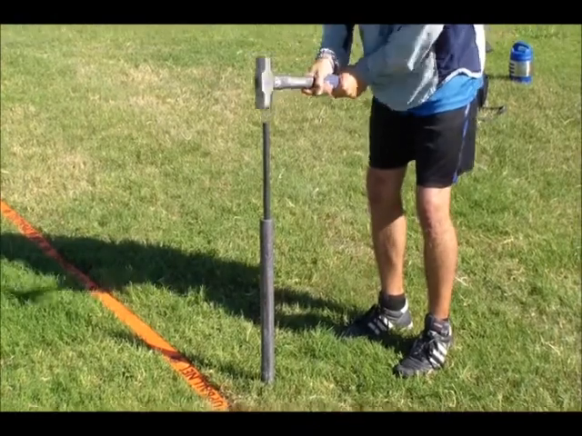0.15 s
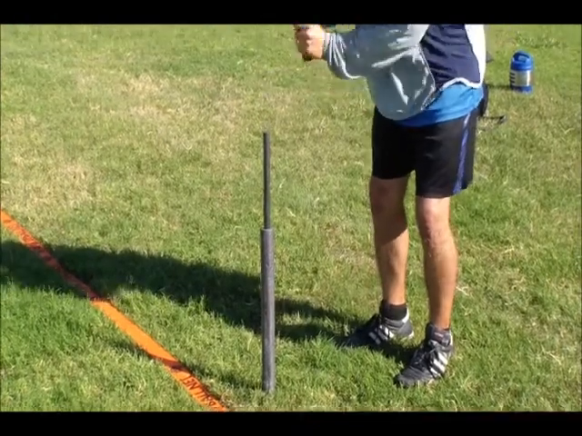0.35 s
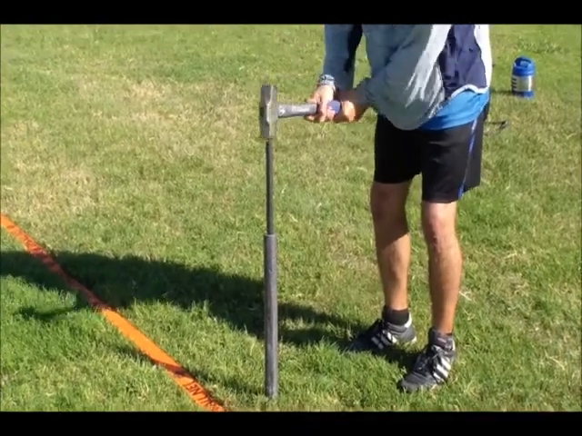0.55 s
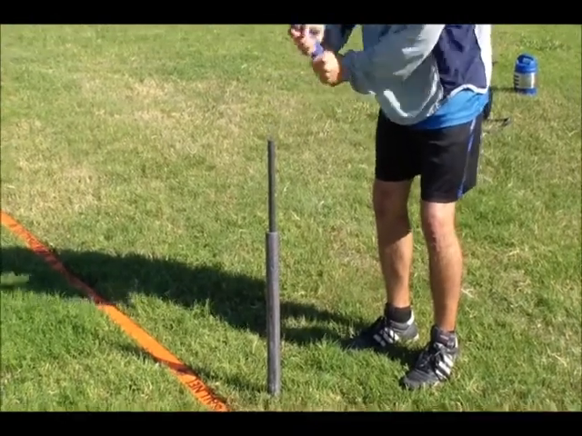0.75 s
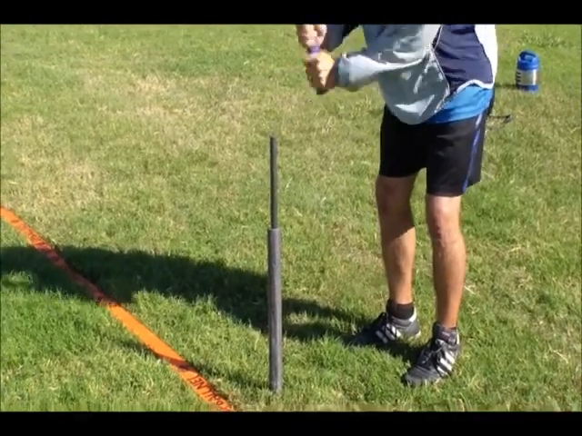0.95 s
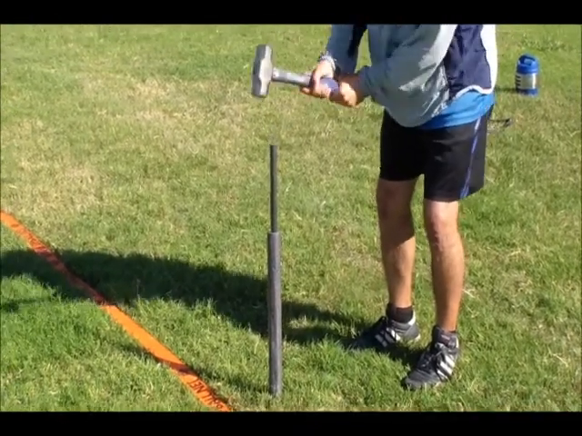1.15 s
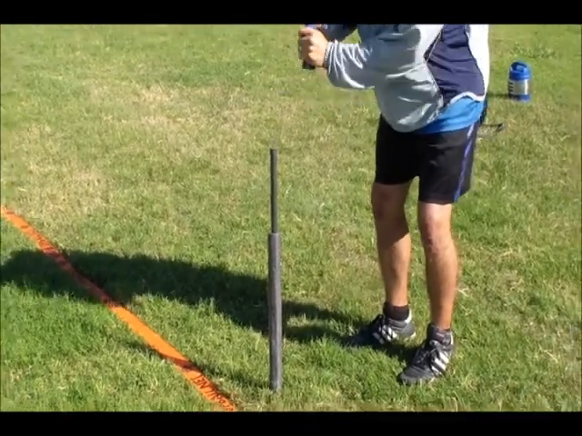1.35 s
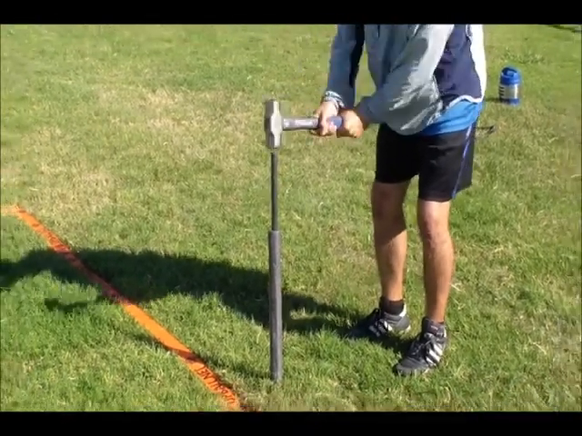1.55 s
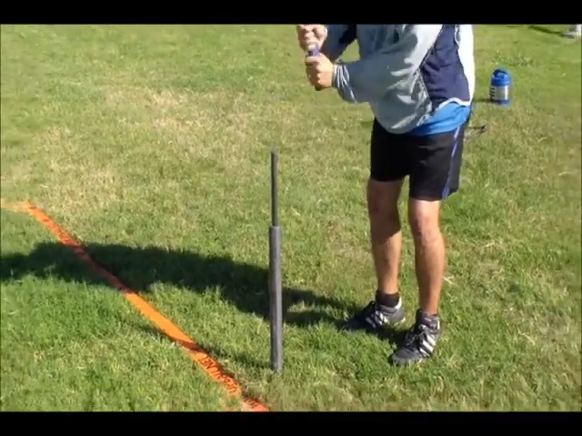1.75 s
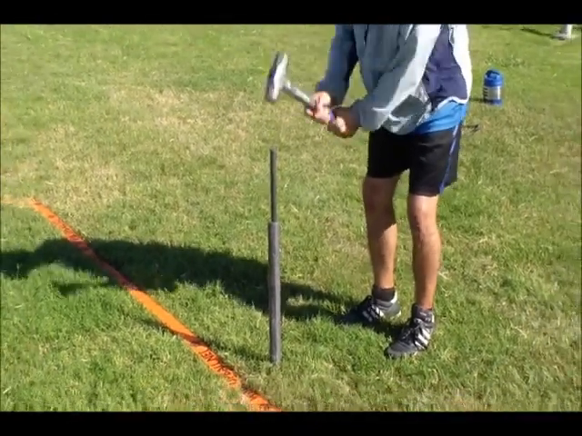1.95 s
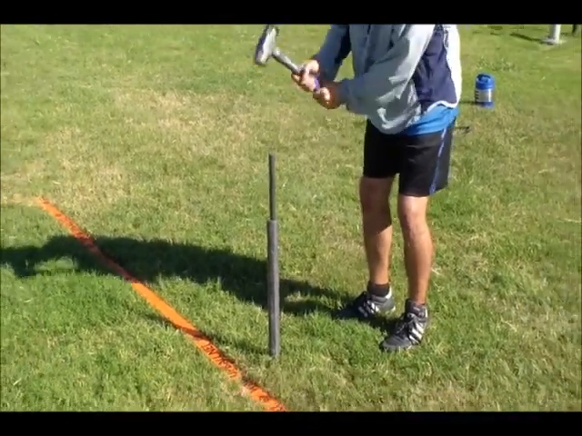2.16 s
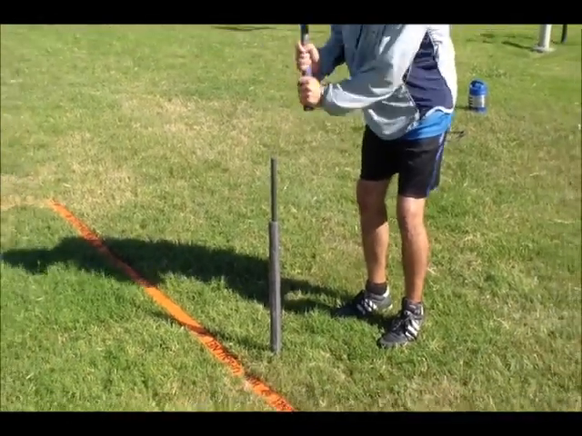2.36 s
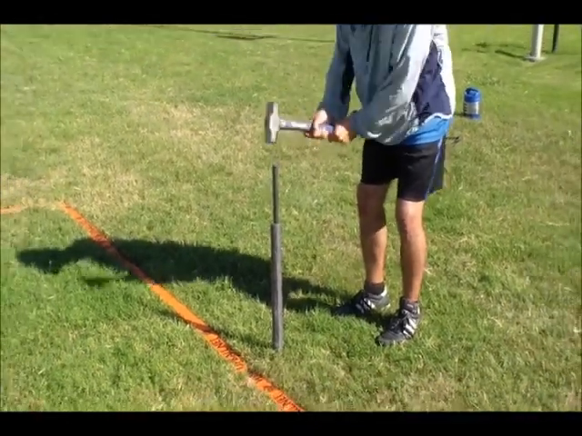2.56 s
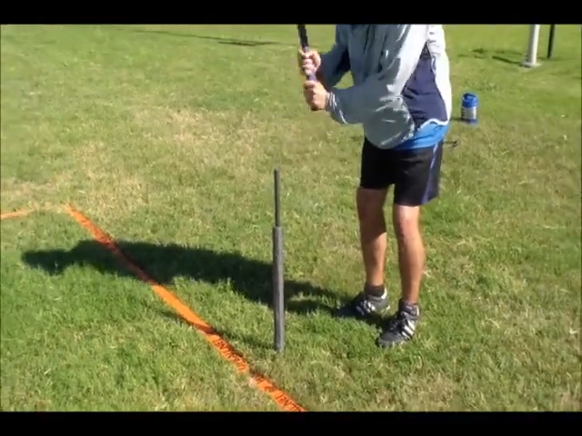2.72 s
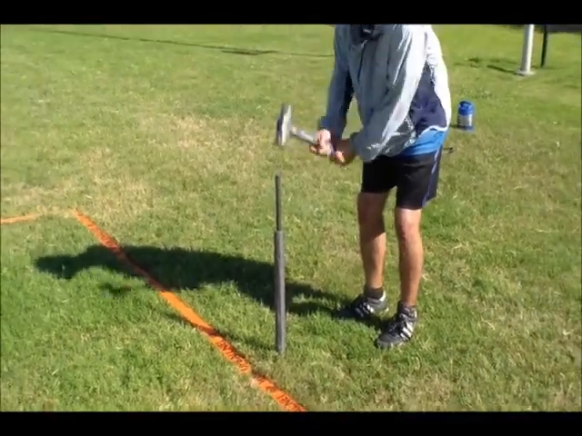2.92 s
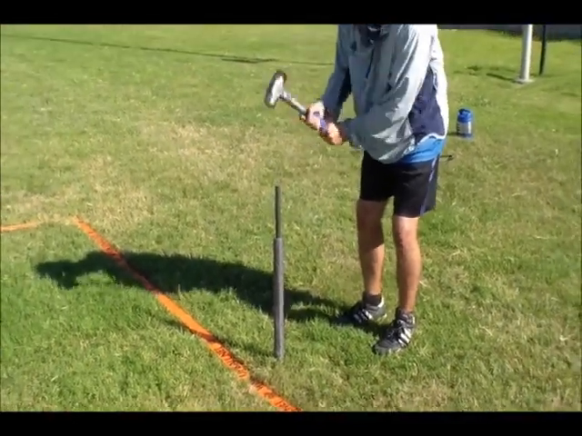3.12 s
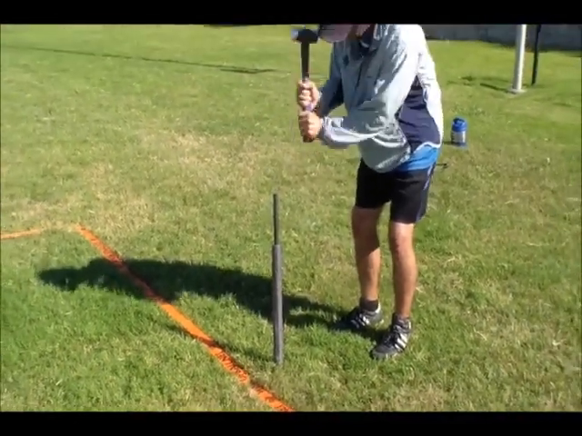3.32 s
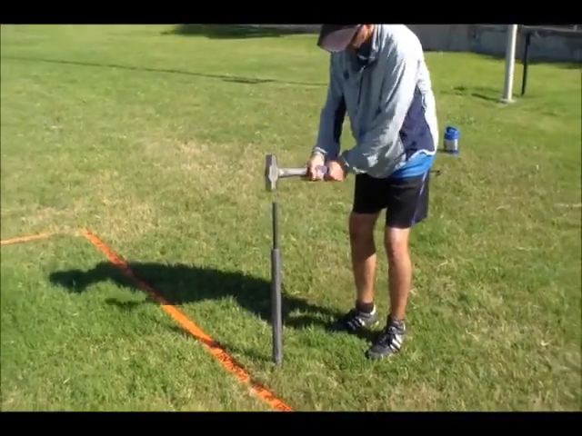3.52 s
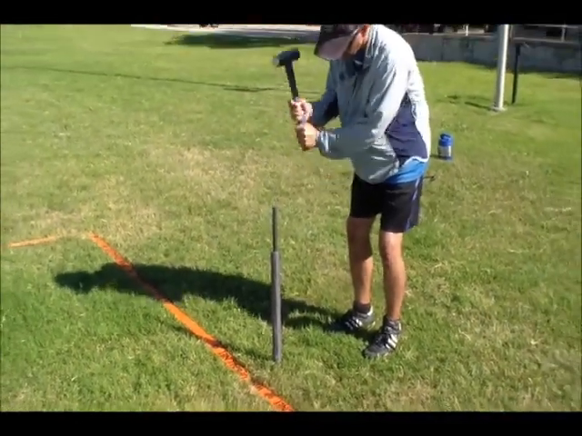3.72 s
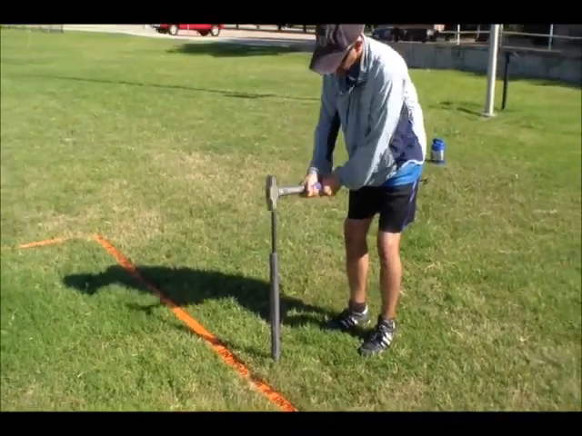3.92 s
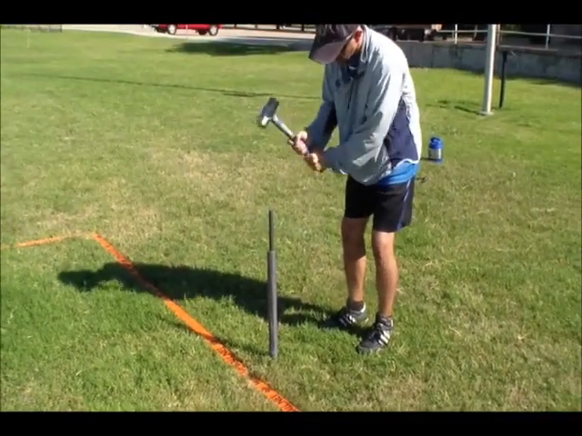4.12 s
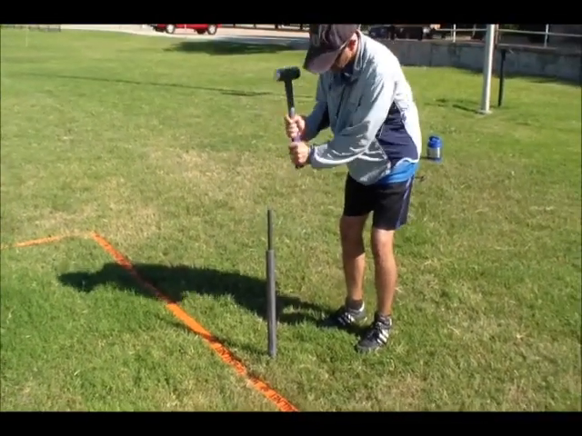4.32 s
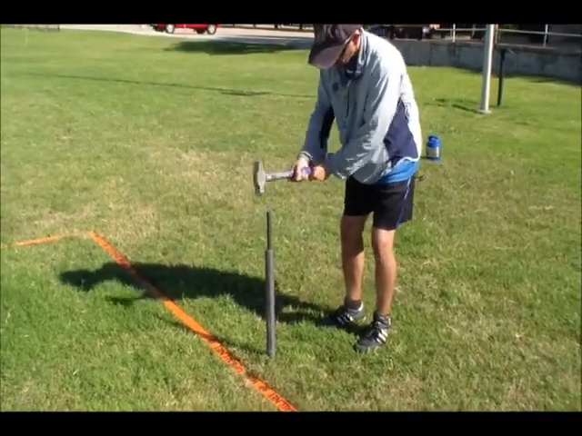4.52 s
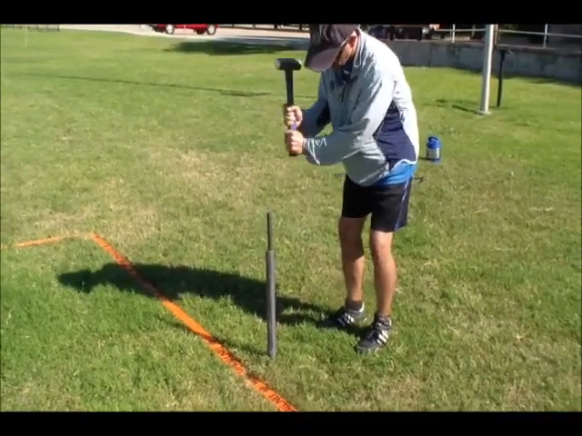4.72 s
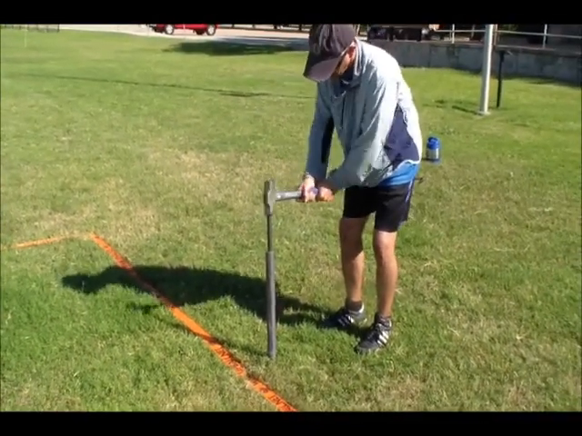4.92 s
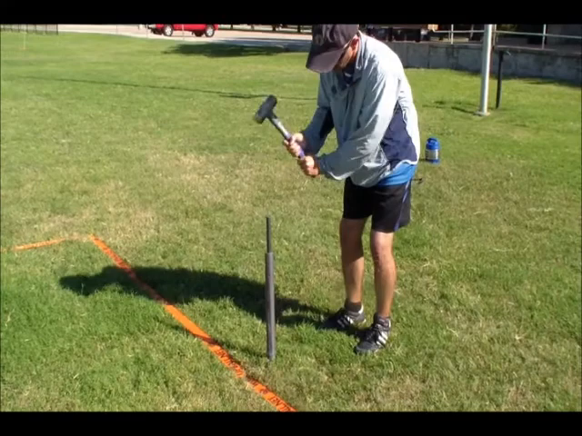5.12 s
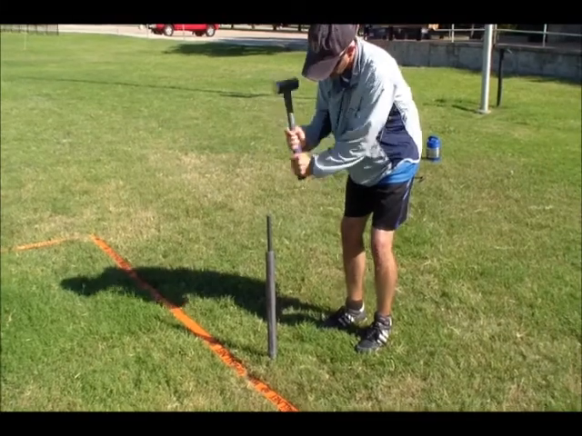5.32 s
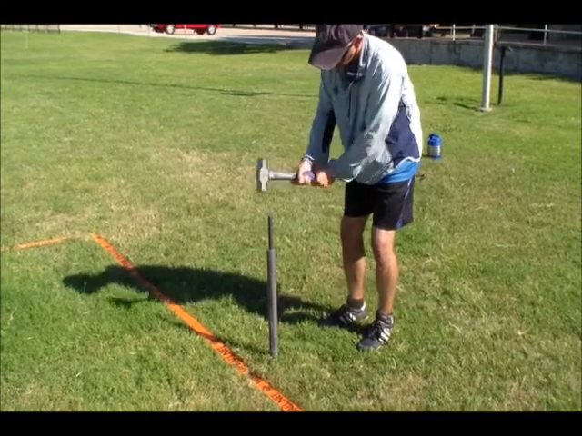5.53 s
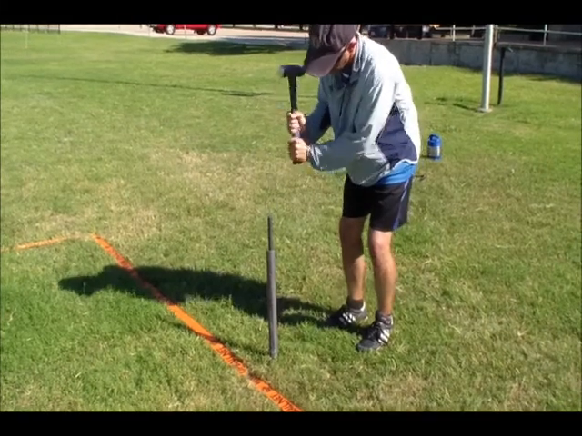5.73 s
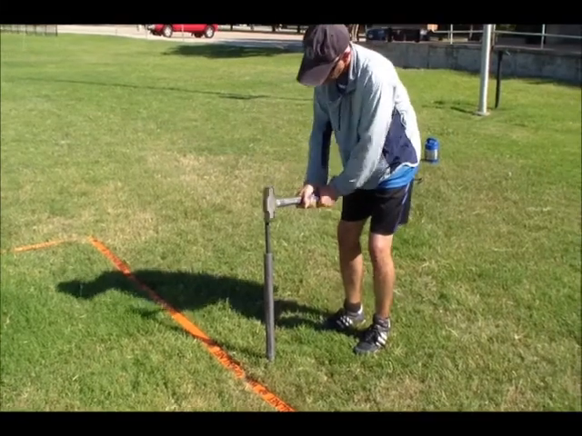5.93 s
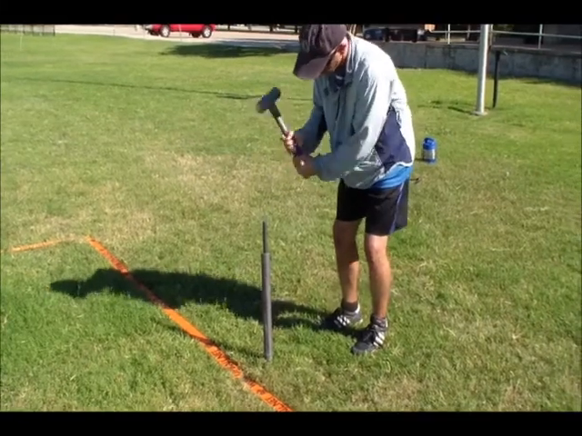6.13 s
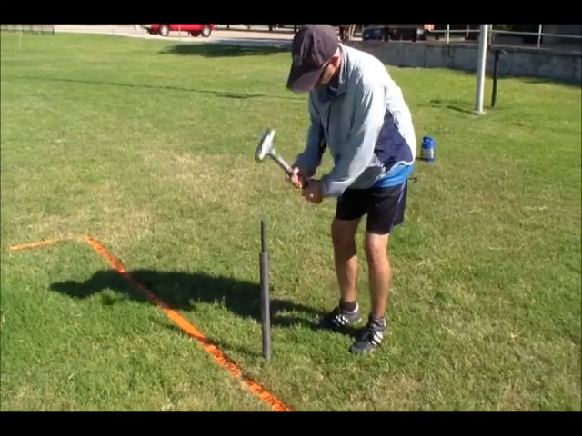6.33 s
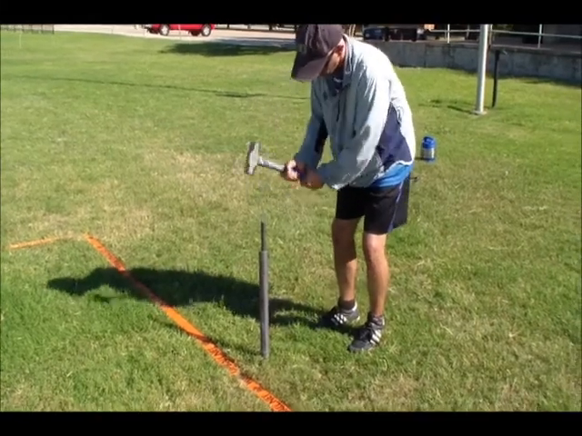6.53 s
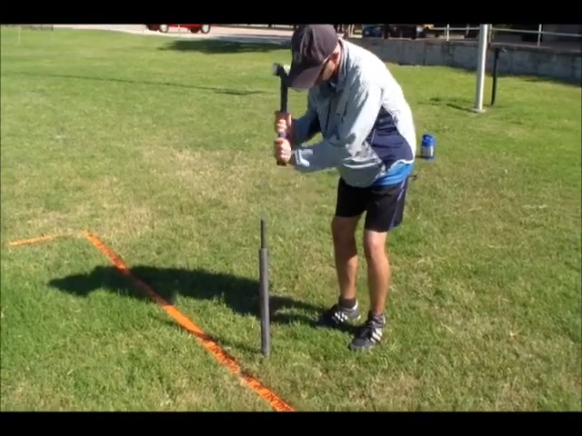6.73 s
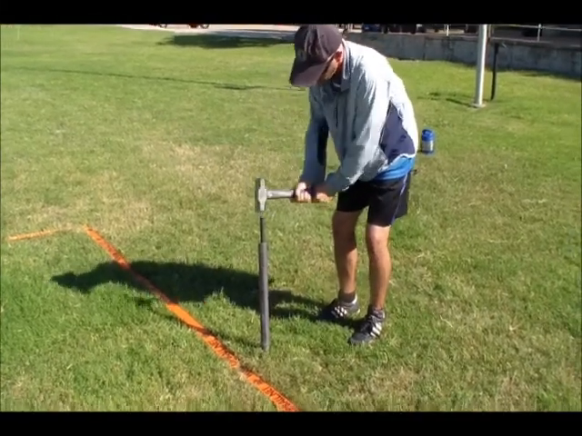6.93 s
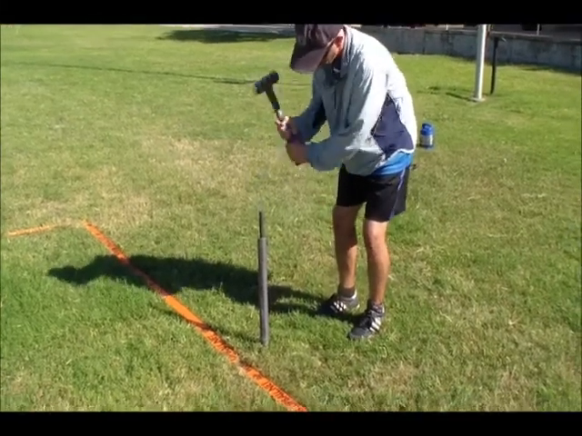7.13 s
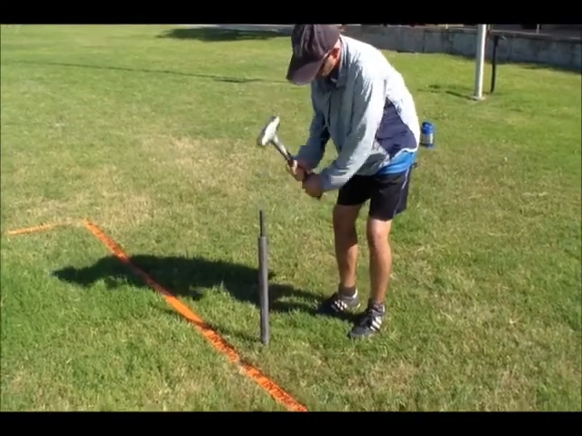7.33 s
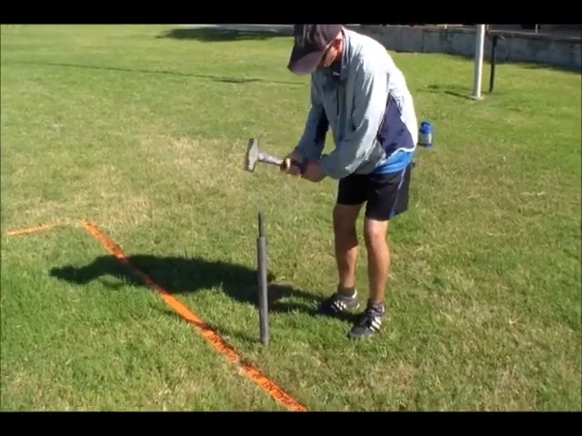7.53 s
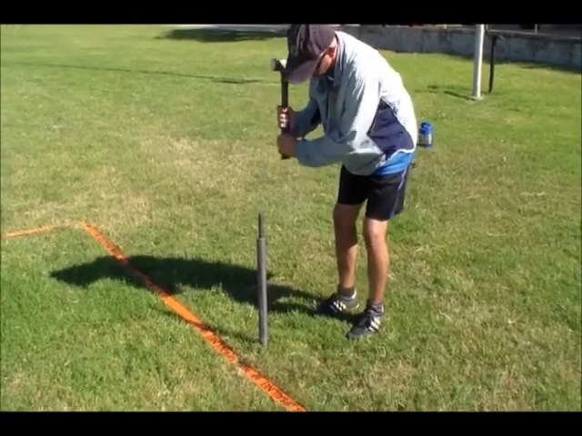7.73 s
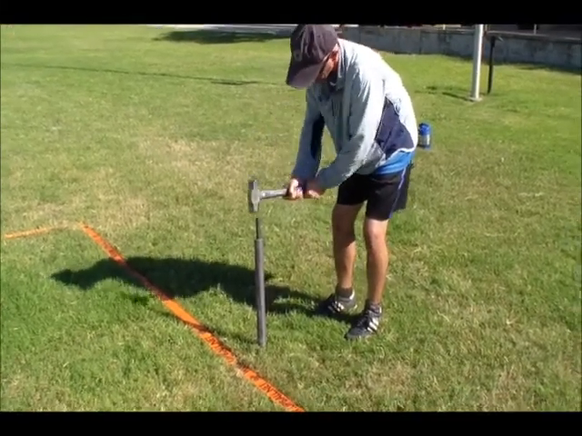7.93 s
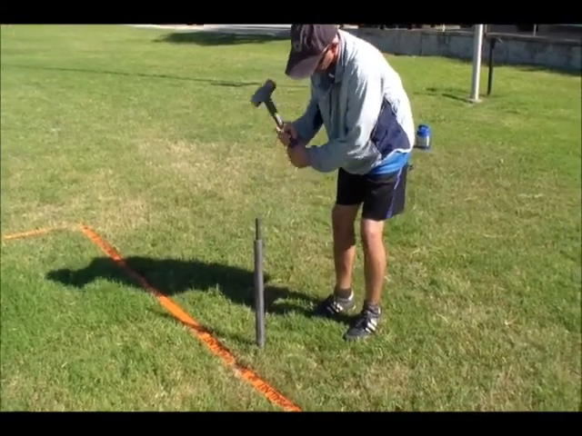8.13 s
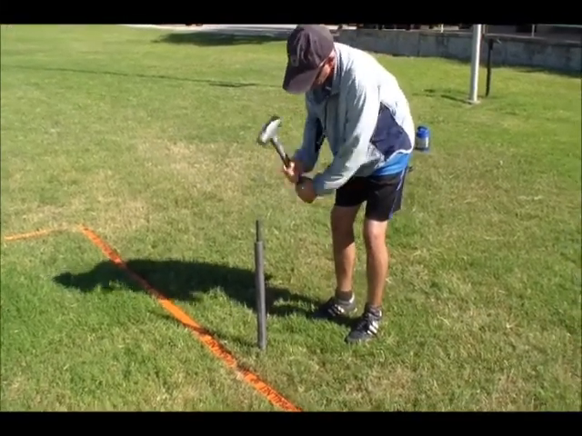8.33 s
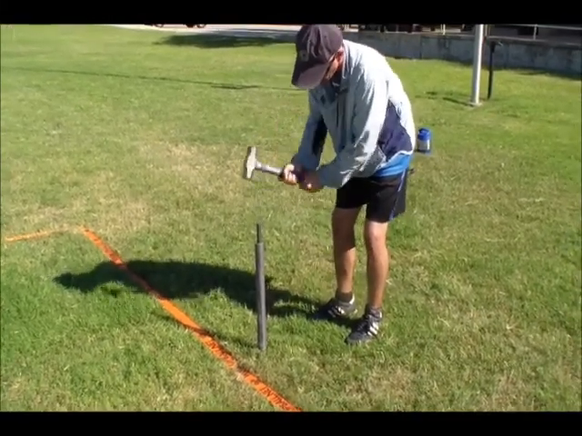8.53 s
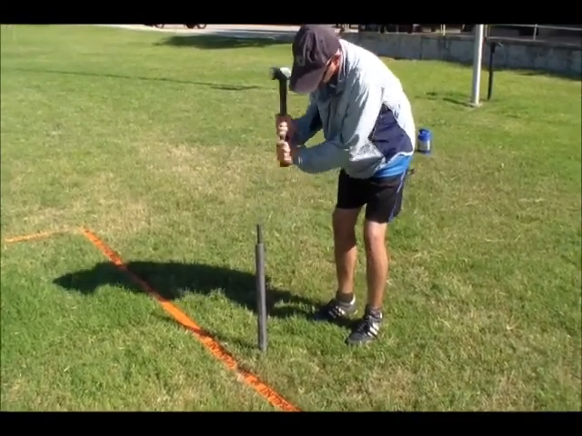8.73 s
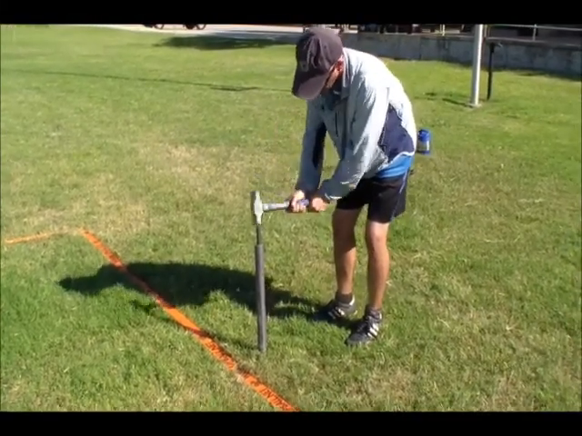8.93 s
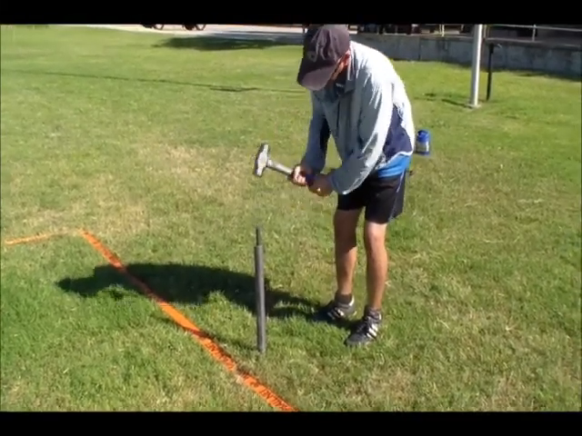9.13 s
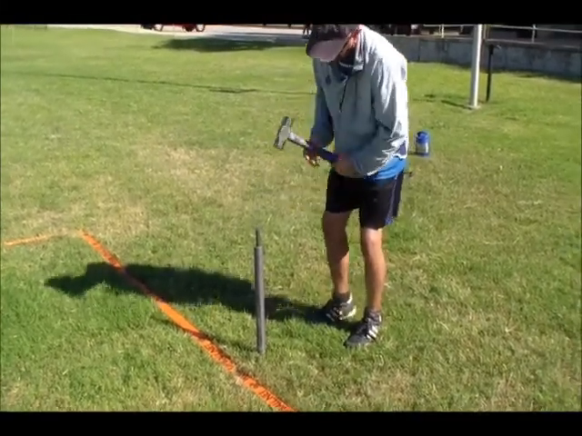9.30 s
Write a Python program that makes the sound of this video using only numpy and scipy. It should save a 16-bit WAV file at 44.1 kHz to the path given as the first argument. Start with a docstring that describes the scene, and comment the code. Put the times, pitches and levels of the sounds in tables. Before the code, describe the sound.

Steady, bright metal-on-metal hammering outdoors, nineteen short hard clinks with small bounces and slapback from far walls over faint traffic rumble.

```python
"""An open lawn: a steel mallet drives a steel rod, two blows a second.
Each blow is a noise crack plus dying sines; the mallet rebounds as duller taps, its head sings on.
Filtered taps return the blow from far walls. Shaped noise makes distant traffic and grass insects;
a far bird whistles once. The input soft-clips, and gain control ducks what follows each blow."""
import sys
import numpy as np
from scipy import signal
from scipy.io import wavfile
from scipy.ndimage import uniform_filter1d, minimum_filter1d

SR = 44100
rng = np.random.default_rng(int(sys.argv[2]) if len(sys.argv) > 2 else 0)


def to_wav(s):
    """Save 16-bit WAV."""
    ch = np.atleast_2d(s).T  # columns
    pcm = np.round(np.clip(ch, -1, 1) * 32767)  # PCM
    wavfile.write(sys.argv[1], SR, pcm.astype(np.int16))


N = 417230


def gain_of(db):
    """Decibels to amplitude."""
    return 10 ** (np.asarray(db) / 20)


def evened(x):
    """Scales to rms 1."""
    return x / np.sqrt(np.mean(x ** 2) + 1e-20)


def read(points, hz):
    """Interpolates a table on a log-frequency axis."""
    f, value = np.transpose(points)
    return np.interp(np.log(hz + 1), np.log(f + 1), value)


def add(mix, time_s, sound):
    """Mixes a sound in at time_s, cut at the end of the mix."""
    part = mix[..., round(time_s * SR):][..., :sound.shape[-1]]
    part += sound[..., :part.shape[-1]]


def ring(modes, t, spread_db=0., damping=1, wander=0.):
    """Sum of exponentially dying sines; random phase, level spread and relative pitch spread."""
    hz, db, t60_s = np.transpose(modes)[:, :, None]
    size = rng.standard_normal(hz.shape)
    shift = rng.standard_normal(hz.shape)
    start_cycles = rng.random(hz.shape)
    level_db = db + spread_db * size - 60 * t * damping / t60_s
    sines = np.sin(2 * np.pi * (hz * (1 + wander * shift) * t + start_cycles))
    return (gain_of(level_db) * sines).sum(0)


# short modes of rod and sleeve, relative levels:
# (frequency [Hz], level to microphone [dB], level to walls [dB], t60 [s])
SHORT_MODES = [(1434, -3.5, -14, 0.014), (1860, 16.5, -32, 0.0048), (2454, 12, -30, 0.0078),
               (3258, 3.5, -14.5, 0.015), (3983, 7, -15, 0.014), (4772, 5, -13.5, 0.015),
               (6583, 5.5, -48, 0.01), (7590, 9, -12, 0.012), (9960, -4, -16, 0.034),
               (12280, 4.5, -40, 0.0061), (13720, 5, -32, 0.0045), (16500, -10, -44, 0.028)]
# lengthwise rod modes, near whole multiples: same columns
LONG_MODES = [(2836, 11, 14, 0.024), (5687, 7.5, 15, 0.031), (8530, 13.5, 19, 0.022),
              (11286, 11, 18.5, 0.021), (14560, 0, 17, 0.016)]
# off-centre hits feed the top modes and starve the middle ones:
# (group centre [Hz], level in a usual blow [dB], gain per dB of extra head ring [dB/dB])
MODE_GROUPS = [(2030, -17, -.1), (4000, -16, -0.5), (6930, -14.5, -0.43), (10200, -19, 0.79)]
GROUP_HZ, USUAL_GROUPS_DB, GROUP_GAIN_DB_PER_DB = np.transpose(MODE_GROUPS)
TO_MICROPHONE, TO_WALLS = 1, 2  # level column


def steel(t, column, groups_db, long_db, damping=1):
    """Struck steel: short modes of rod and sleeve plus lengthwise rod modes, in one direction."""
    short, long = (np.array(m, float)[:, [0, column, -1]] for m in (SHORT_MODES, LONG_MODES))
    short[:, 1] += read(list(zip(GROUP_HZ, groups_db)), short[:, 0])
    long[:, 1] += long_db
    short_ring = ring(short, t, spread_db=1.47, damping=damping, wander=0.015)
    return short_ring + ring(long, t, spread_db=0.83, damping=damping)


# sleeve thunk, relative level: (frequency [Hz], level [dB], t60 [s])
THUNK_MODES = [(343, 1, 0.015), (738, 12, 0.01), (1102, 6, 0.0082)]
CRACK_DB, CRACK_FAR_DB, CRACK_SIDE_DB = -5, -3.5, -11  # relative; side is added to CRACK_DB
CRACK_S = 0.0036  # 1/e time of the Gaussian fade
NEARBY_DB, NEARBY_T60_S = -19.5, 0.084  # scatter by ground and body
GRIP_S, GRIP_DB_PER_S = 0.013, 1503  # head settles on the rod and chokes the ring
RISE_S = 0.000082


def blow(strength_db, thunk_db, groups_db, long_db, echo_db):
    """Steel on steel: broad contact crack excites the modes; returns microphone and wall sound."""
    t = np.arange(SR // 10) / SR
    crack, side = np.exp(-(t / CRACK_S) ** 2) * rng.standard_normal((2, len(t)))
    crack = uniform_filter1d(crack, size=2)  # weak top octave
    choke = gain_of(-GRIP_DB_PER_S * np.maximum(t - GRIP_S, 0))

    rod = choke * steel(t, TO_MICROPHONE, groups_db, long_db)
    stereo_crack = gain_of(CRACK_DB + CRACK_SIDE_DB) * np.outer([1, -1], np.gradient(side))
    near = gain_of(CRACK_DB) * crack + rod + stereo_crack
    near = gain_of(strength_db) * near + gain_of(thunk_db) * ring(THUNK_MODES, t)
    near *= 1 - np.exp(-t / RISE_S)

    nearby = gain_of(-60 * t / NEARBY_T60_S) * rng.standard_normal((2, len(t)))
    nearby *= gain_of(NEARBY_DB) / np.linalg.norm(nearby[0])
    near = near + signal.fftconvolve(near, nearby, axes=1)[:, :len(t)]

    far_rod = choke * steel(t, TO_WALLS, np.zeros(len(MODE_GROUPS)), long_db)
    far = gain_of(CRACK_FAR_DB) * crack + far_rod
    return near, gain_of(echo_db) * far


HEAD_HZ, HEAD_BEAT_HZ, HEAD_T60_S = 11010, 5.5, 0.56  # beat = spacing of the pair


def head(level_db):
    """Mallet head: a close pair of dying tones, swelling and fading as they beat."""
    t = np.arange(SR // 2) / SR
    start_rad = .8 + .15 * rng.standard_normal()
    beat = np.sin(np.pi * HEAD_BEAT_HZ * t + start_rad)
    return gain_of(level_db - 60 * t / HEAD_T60_S) * beat * np.sin(2 * np.pi * HEAD_HZ * t)


TOUCH_TILT_DB_PER_OCT, TOUCH_DULLING = -4.5, 0.49  # at strength 0; dB/octave per dB of strength
TOUCH_SHORT_DB, TOUCH_LONG_DB, TOUCH_THUNK_DB = -23, -34, -16.5  # relative
TOUCH_CRACK_DB, TOUCH_CRACK_S = -28, .003  # relative; 1/e time
TOUCH_DAMPING, TOUCH_RISE_S = 0.84, 0.0018  # decay-rate factor on the steel modes


def touch(strength_db):
    """Light tap on the same steel: soft rise, grit; softer taps tilt the short modes duller."""
    t = np.arange(SR // 20) / SR
    tilt_db_per_oct = TOUCH_TILT_DB_PER_OCT + TOUCH_DULLING * strength_db
    groups_db = TOUCH_SHORT_DB + tilt_db_per_oct * np.log2(GROUP_HZ / 4000)
    rod = steel(t, TO_MICROPHONE, groups_db, TOUCH_LONG_DB, damping=TOUCH_DAMPING)
    grit = uniform_filter1d(rng.standard_normal(len(t)), size=5) * np.exp(-(t / TOUCH_CRACK_S) ** 2)
    thunk = gain_of(TOUCH_THUNK_DB) * ring(THUNK_MODES, t)
    tap = rod + thunk + gain_of(TOUCH_CRACK_DB) * grit
    return gain_of(strength_db) * tap * (1 - np.exp(-t / TOUCH_RISE_S))


# single walls: (delay [s], level below 2 kHz [dB], level above [dB])
WALL_ECHOES = [(.0455, -34, -23.5), (0.068, -14, -17.5), (0.0996, -19, -27), (0.109, -13, -28),
               (0.138, -43, -35.5)]
# colour of all echoes: (frequency [Hz], level [dB])
ECHO_COLOUR = [(500, -20), (1300, -4.5), (3000, 0.5), (6000, -3), (9000, -13.5), (12000, -18.5),
               (16000, -21)]
# envelope of many small echoes, relative: (delay [s], level [dB])
SCATTER_ENVELOPE = [(.03, -22), (.075, 8), (0.109, 3), (.17, -4.5), (.24, -12), (.42, -75)]
SCATTER_DB, SCATTER_SAME = -15, 0.36  # total; power share common to left and right


def echoes(x):
    """Far walls: single reflections plus sparse random-sign taps, thin in bass and top."""
    size = SR // 2
    at = np.arange(0, size - 20, 20) + rng.integers(0, 20, (3, (size - 1) // 20))
    taps = np.zeros((3, size))
    np.put_along_axis(taps, at, rng.choice([-1., 1.], at.shape), 1)
    taps = np.sqrt(SCATTER_SAME) * taps[0] + np.sqrt(1 - SCATTER_SAME) * taps[1:]
    taps *= gain_of(np.interp(np.arange(size) / SR, *np.transpose(SCATTER_ENVELOPE)))
    taps *= gain_of(SCATTER_DB) / np.linalg.norm(taps[0])

    low = signal.firwin(63, 2000, fs=SR)
    high = signal.unit_impulse(len(low), "mid") - low
    for delay_s, low_db, high_db in WALL_ECHOES:
        wall = gain_of(low_db) * low + gain_of(high_db) * high
        add(taps, delay_s, wall[None])

    hz = np.linspace(0, SR / 2, 257)
    colour = signal.firwin2(127, hz, gain_of(read(ECHO_COLOUR, hz)), fs=SR)
    coloured = signal.oaconvolve(x, colour, "same")
    return signal.fftconvolve(coloured[None], taps, axes=1)[:, :N]


# traffic spectrum, relative: (frequency [Hz], level per Hz [dB])
TRAFFIC_SPECTRUM = [(12, -31), (20, -15.5), (68, 5), (113, -6.5), (158, -9.5), (248, -14), (377, -25),
                    (802, -23.5), (1710, -31.5), (2600, -32), (2990, -32), (3340, -31), (5850, -37.5),
                    (12100, -43.5), (16000, -49)]
# (frequency [Hz], left-right correlation [-1..1])
TRAFFIC_SAME = [(60, 0.92), (180, 0.98), (550, 0.77), (1650, 0.68), (4970, 0.17), (15000, 0.11)]
# (frequency [Hz], left over right [dB])
TRAFFIC_BALANCE = [(60, 1.0), (380, 0.11), (2380, 0.0), (15000, 0.0)]
# bass swell, relative: (time [s], level [dB])
TRAFFIC_RUMBLE = [(0.0, 1), (0.75, 0), (0.95, 1.5), (1.75, -1), (3.27, 1), (4.3, -0.2), (7.2, 1.9),
                  (7.6, -1), (8.25, -2.5), (9.46, 0.7)]
TRAFFIC_DB = -35  # overall rms
PATCH_DB, SWELL_DB, SWELL_EDGE_HZ = 1.3, 1.3, 600  # rms, rms in the bass, 1/e frequency of the swell


def traffic():
    """Distant traffic: random short-time spectra with drifting patches and a slow bass swell."""
    frames, hz = N // 256 + 5, np.fft.rfftfreq(1024, 1 / SR)
    a, b, c, d, patches = rng.standard_normal((frames, 513, 5)).T
    patches = evened(uniform_filter1d(uniform_filter1d(patches, 8, 0), 10, 1))

    t = np.arange(frames) * 256 / SR
    swell_hz = np.geomspace(.3, 8, 20)
    swell = evened(sum(np.sin(2 * np.pi * (f * t + rng.random())) / np.sqrt(f) for f in swell_hz))
    rumble_db = np.interp(t - 512 / SR, *np.transpose(TRAFFIC_RUMBLE))
    bass_db = (SWELL_DB * swell + rumble_db) * np.exp(-hz / SWELL_EDGE_HZ)[:, None]

    same = read(TRAFFIC_SAME, hz)[:, None]
    left = a + 1j * b
    right = same * left + np.sqrt(1 - same ** 2) * (c + 1j * d)
    spectra = np.array([left, right])
    half_balance = np.array([.5, -.5])[:, None, None]
    spectra *= gain_of(half_balance * read(TRAFFIC_BALANCE, hz)[:, None])
    spectra *= gain_of(read(TRAFFIC_SPECTRUM, hz)[:, None] + PATCH_DB * patches + bass_db)
    noise = signal.istft(spectra, nperseg=1024, noverlap=768)[1][:, :N]
    return gain_of(TRAFFIC_DB) * evened(noise)


# (time [s], lower band level [dB], upper band level [dB])
INSECT_LEVELS = [(0, -55, -55), (1.8, -55, -51), (3, -82, -56.5), (5, -86.5, -61), (7, -119, -64.5),
                 (9.46, -74, -58)]
# (centre [Hz], width [Hz])
INSECT_BANDS = [(2560, 110), (3300, 790)]


def insects():
    """Grass insects: band-passed noise in two fuzzy bands with drifting levels."""
    time_s, *levels_db = np.transpose(INSECT_LEVELS)
    t, out = np.arange(N) / SR, np.zeros((2, N))
    for (hz, width_hz), db in zip(INSECT_BANDS, levels_db):
        edges_hz = [hz - width_hz / 2, hz + width_hz / 2]
        band = signal.butter(2, edges_hz, "band", fs=SR, output="sos")
        noise = evened(signal.sosfilt(band, rng.standard_normal((2, N))))
        out += gain_of(np.interp(t, time_s, db)) * noise
    return out


# far bird: (time [s], length [s], start [Hz], end [Hz], level [dB])
BIRD_CHIRP = (9.38, .035, 3050, 2950, -52)


def bird():
    """Far bird: one short, slightly falling sine whistle."""
    time_s, length_s, start_hz, end_hz, db = BIRD_CHIRP
    hz = np.linspace(start_hz, end_hz, round(length_s * SR))
    whistle = np.hanning(len(hz)) * np.sin(2 * np.pi * np.cumsum(hz) / SR)
    return time_s, gain_of(db) * whistle[None]


# (time [s], strength [dB], sleeve thunk [dB], head ring [dB], long modes [dB], echo [dB])
BLOWS = [(0.1232, 5.5, -27, -54, -21, -4), (0.5914, 2, -16, -47, -15.5, -5),
         (1.0703, 2.5, -11.5, -39, -14, -4), (1.5437, 6, -17.5, -33, -19.5, -2),
         (2.0195, 7, -27, -36.5, -22.5, 0.5), (2.4937, 7.5, -22.5, -46, -27.5, 3),
         (2.983, 9.5, -11, -47, -27.5, 4.5), (3.4775, 7.5, -14.5, -42, -24, 0.5),
         (3.9647, 5, -14, -42, -24, -0.5), (4.4595, 4.5, -13.5, -24.5, -21, 2.5),
         (4.9505, 7.5, -12, -38.5, -23, 1.5), (5.451, 8, -9, -41, -24, 5), (5.9284, 5, -10, -51, -23, 3.5),
         (6.407, 5.5, -10.5, -48, -23, 2.5), (6.9033, 2.5, -16.5, -40, -20.5, 1),
         (7.4109, 6.5, -23.5, -40, -28, 1), (7.921, 3, -19.5, -45, -20.5, -3.5),
         (8.421, 2.5, -29.5, -35, -22, 3), (8.9399, 6, -33, -32, -25, -0.5)]
# mallet bounces, and one graze just before a blow: (time [s], strength [dB])
TOUCHES = [(0.142, -8), (0.608, -4), (1.086, 2.5), (1.557, -2), (2.036, -3), (2.51, 1), (2.997, 2),
           (3.468, -13), (3.492, -5), (3.979, -4), (4.472, 3), (4.964, -7), (5.464, 0.5), (5.941, 3.5),
           (6.419, -5), (6.916, -1), (7.425, -7), (7.936, -9), (8.438, -3), (8.954, -14)]
USUAL_HEAD_DB = -40


def scene():
    """Blows and touches, their far echoes and the background."""
    near, far = np.zeros((2, N)), np.zeros(N)
    for time_s, strength_db, thunk_db, head_db, long_db, echo_db in BLOWS:
        groups_db = USUAL_GROUPS_DB + GROUP_GAIN_DB_PER_DB * (head_db - USUAL_HEAD_DB)
        to_microphone, to_walls = blow(strength_db, thunk_db, groups_db, long_db, echo_db)
        add(near, time_s, to_microphone)
        add(near, time_s, head(head_db)[None])
        add(far, time_s, to_walls)
    for time_s, strength_db in TOUCHES:
        add(near, time_s, touch(strength_db)[None])
    add(near, *bird())
    return near + echoes(far) + traffic() + insects()


HOLD_S, RECOVERY_DB_PER_S, SMOOTH_S = 0.037, 230., .0035
START_DB, DEEPEST_DB, EDGE_HZ = -27, 16, 16300  # threshold, most reduction, low-pass edge


def record(dry):
    """Input soft-clips; gain falls within milliseconds, holds, recovers; low-pass."""
    clipped = 0.83 * np.tanh(dry / 0.81)
    power = uniform_filter1d((clipped ** 2).mean(0), size=64)
    power_db = 10 * np.log10(abs(power) + 1e-12)
    half = round(HOLD_S * SR / 2)
    held_db = -minimum_filter1d(-power_db, size=2 * half + 1, origin=half)  # trailing maximum
    fall_db = np.arange(N) * RECOVERY_DB_PER_S / SR
    level_db = np.maximum.accumulate(held_db + fall_db) - fall_db
    over_db = np.clip(level_db - START_DB, 0, DEEPEST_DB)
    r = np.exp(-1 / (SMOOTH_S * SR))  # two poles: gain starts to fall late, then fast
    reduction_db = signal.lfilter([(1 - r) ** 2], [1, -2 * r, r * r], over_db)
    ducked = clipped / gain_of(reduction_db)
    low_pass = signal.firwin(301, EDGE_HZ, window=("kaiser", 12), fs=SR)
    return signal.oaconvolve(ducked, low_pass[None], "same")


dry = scene()
out = record(dry)
to_wav(out)
```